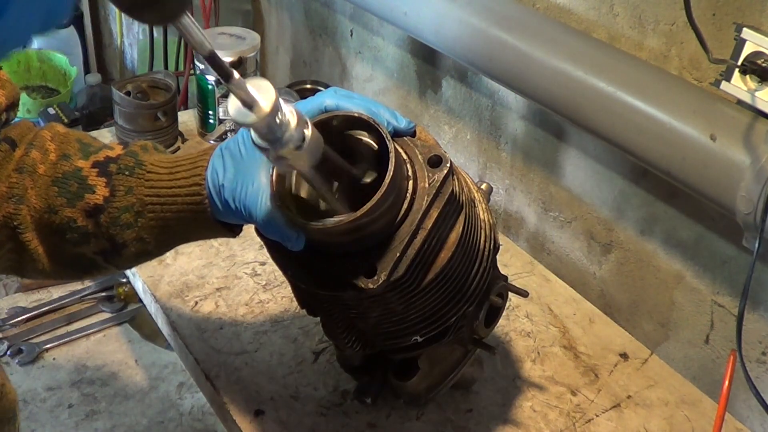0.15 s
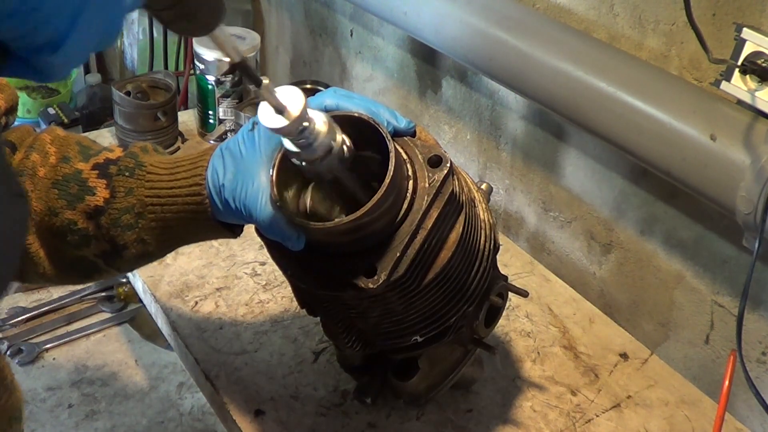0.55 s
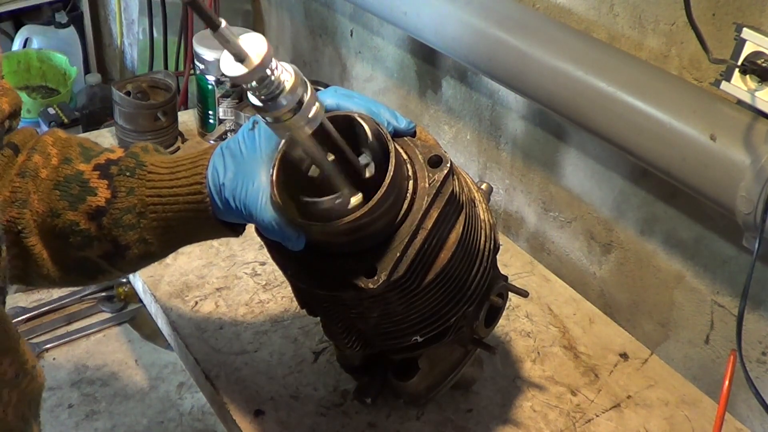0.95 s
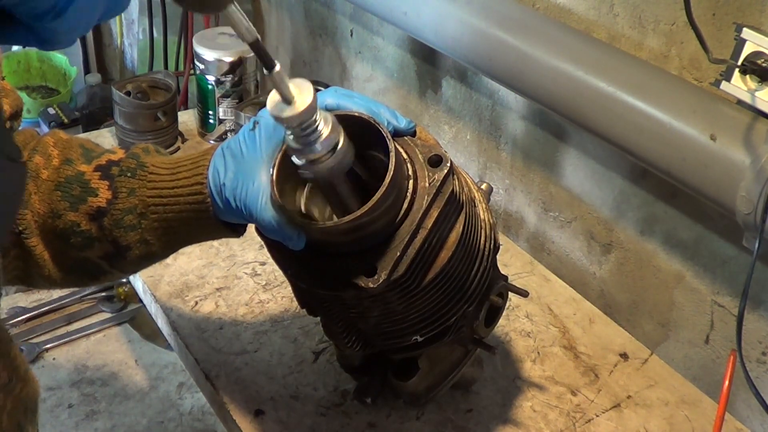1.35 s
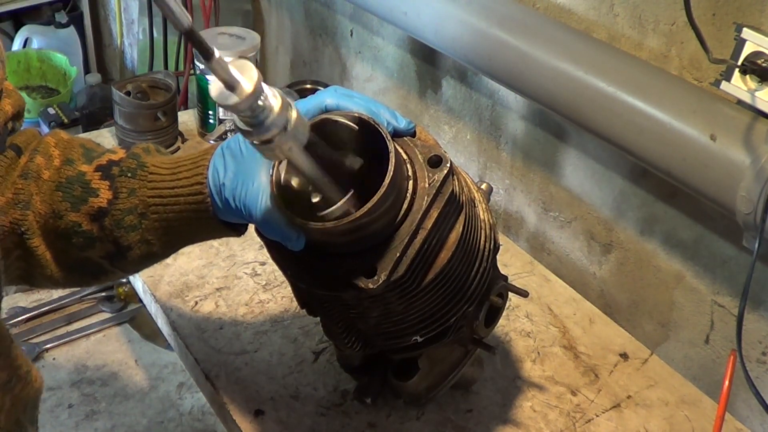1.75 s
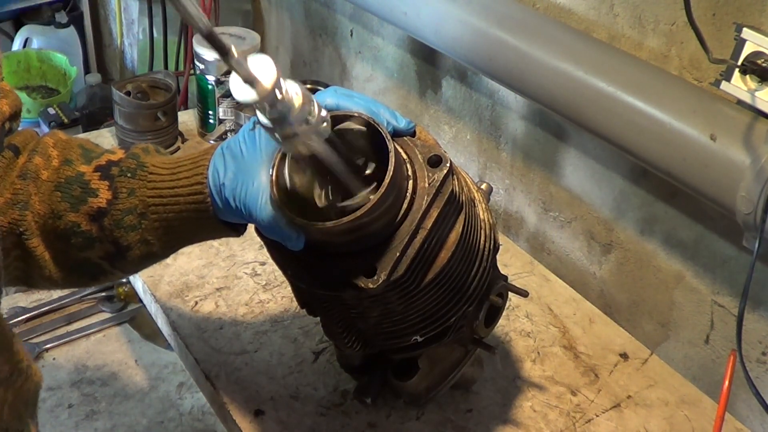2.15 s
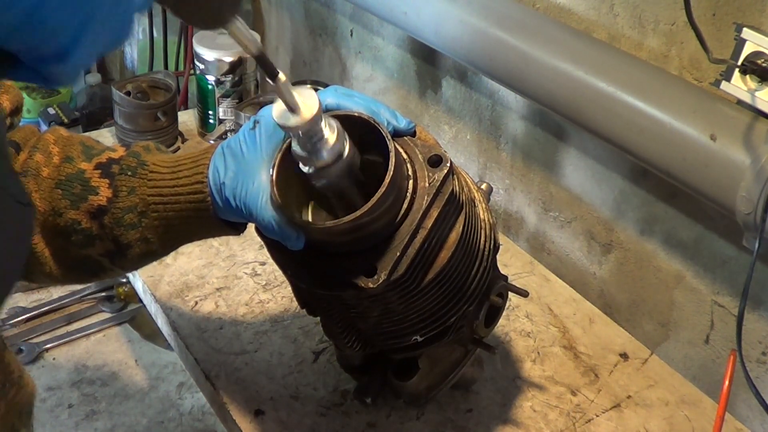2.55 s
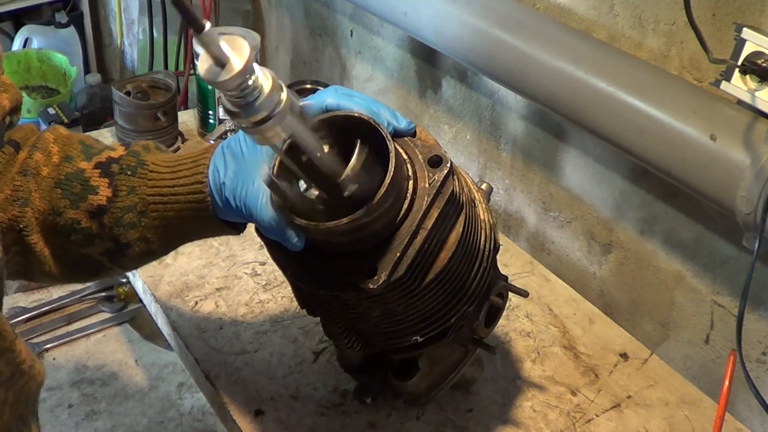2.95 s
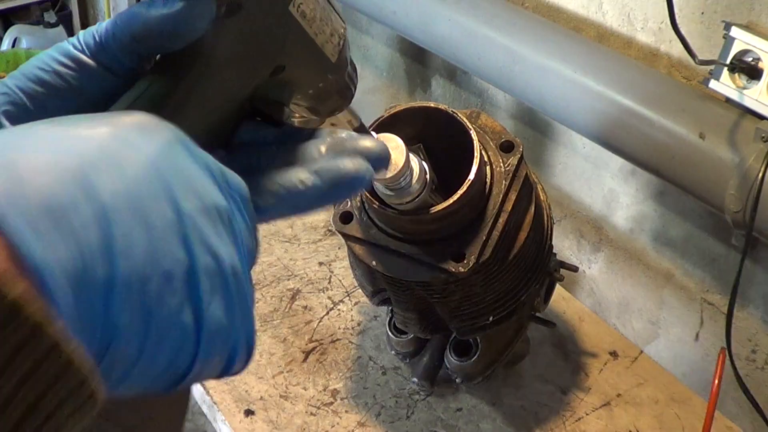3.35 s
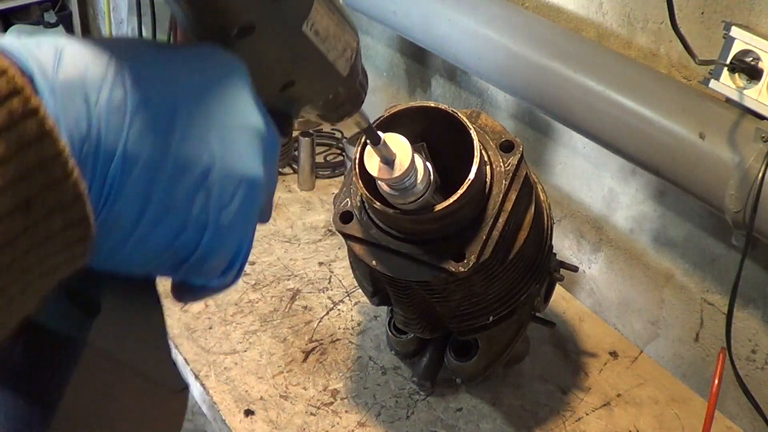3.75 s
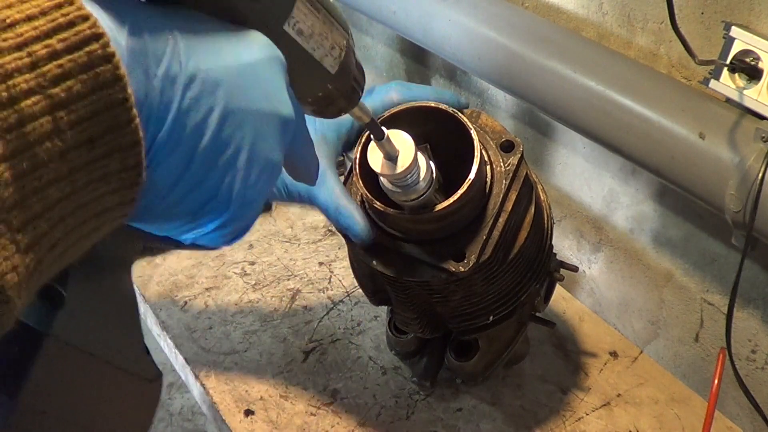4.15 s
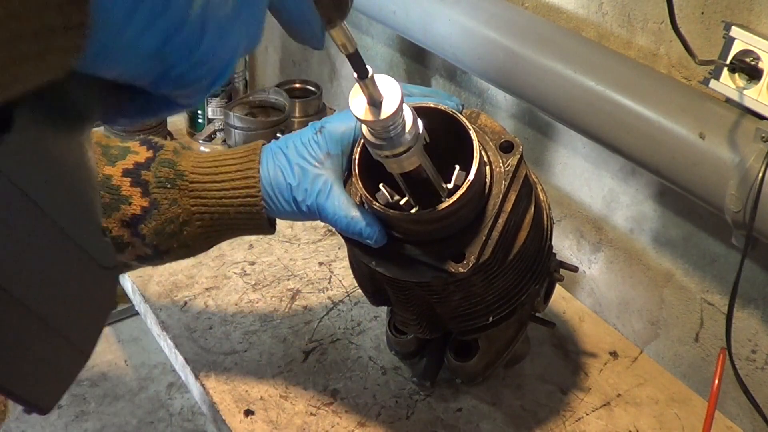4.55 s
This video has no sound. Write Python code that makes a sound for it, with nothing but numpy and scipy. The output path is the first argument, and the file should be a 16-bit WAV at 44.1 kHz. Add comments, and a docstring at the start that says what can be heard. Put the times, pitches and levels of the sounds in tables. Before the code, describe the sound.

Loud, bright abrasive honing with an electric motor whine stops dead, leaving quiet rubber rustles, small steel clinks, dull bench knocks and a final ringing scrape.

```python
"""A workshop bench, where a drill spins a hone in an oiled cylinder liner: the motor whines as harmonics
of its shaft speed, the stones hiss as friction noise, and the liner's resonances sing as each stroke nears
the rim. The honing breaks off abruptly. Rubber gloves rustle and snap over the drill as shaped noise,
struck modes knock on the bench, and the still hone scrapes up the bore over faint room air."""
import sys
import numpy as np
from scipy import signal
from scipy.fft import rfft, irfft, next_fast_len
from scipy.io import wavfile
from scipy.ndimage import uniform_filter1d, map_coordinates

SR = 44100
rng = np.random.default_rng(int(sys.argv[2]) if len(sys.argv) > 2 else 0)


def wav_out(sig):
    """Save sig, one row per channel (or a flat mono array), as 16-bit PCM at SR to the path in sys.argv[1]."""
    wavfile.write(sys.argv[1], SR, np.round(np.clip(np.atleast_2d(sig).T, -1, 1) * 32767).astype(np.int16))


N = 207711
TIME = np.arange(N) / SR

# motor speed: (time [s], shaft speed [turns/s])
SPEED = [(0, 400), (.04, 542), (.1, 607), (.17, 611), (.3, 532), (.43, 484), (.61, 511), (.72, 504),
         (.98, 519), (1.3, 503), (1.42, 506), (1.5, 527), (1.72, 549), (1.85, 538), (2, 540), (2.45, 524),
         (2.58, 530), (2.69, 512), (2.9, 528), (3.22, 524)]
# radiation of the drill's case: (frequency [Hz], relative level [dB])
CASE_RADIATION = [(400, -39), (485, -39), (505, -33), (519, -35.5), (533, -41), (548, -37), (562, -32),
                  (605, -43), (1450, -38), (1520, -38), (1555, -31), (1590, -31), (1618, -29.5),
                  (1648, -36), (1830, -42)]
# weaker motor lines: (multiple of shaft speed [-], relative level [dB])
OVERTONES = [(1.085, -52), (1.335, -54), (2, -47), (4, -45), (5, -51), (6, -52)]
# the weak lines grow as the motor takes up its load: time to full load, starting level
LOAD_S, UNLOADED_DB = 0.81, -2
# the motor works less, and so whines less, with the stones at the rim
WHINE_RIM_DB = -3


def motor():
    """Harmonic radiation: lines at multiples of the shaft speed swell where the case favours their pitch."""
    speed, = curves(SPEED)
    angle = 2 * np.pi * np.cumsum(speed * (1 + 0.0018 * wobble(60.1))) / SR

    def line(multiple, db, flutter_db):
        level = amp(db + flutter_db * wobble(70))
        return np.sqrt(2) * level * np.sin(multiple * angle)

    shaft = line(1, along(CASE_RADIATION, speed) - .2, flutter_db=1.5)
    third_db = along(CASE_RADIATION, 3 * speed) - .4 + 1.6 * wobble(11)
    third = line(3, third_db, flutter_db=2.2)
    load_db = UNLOADED_DB * np.clip(1 - TIME / LOAD_S, 0, 1)
    weak = sum(line(multiple, db + load_db + 0.37, flutter_db=4.0) for multiple, db in OVERTONES)
    whine = (shaft + third) * amp(WHINE_RIM_DB * stroke_height())
    return (whine + weak) * amp([[.6], [-.6]])


# spectrum of the bore scraped by the stones: (frequency [Hz], relative density [dB per Hz])
GRIND = [(25, -48), (110, -61), (200, -51), (430, -24.5), (800, -15), (1120, -9.5), (1420, -13),
         (1900, -4.5), (3000, -6), (4300, -7.5), (5100, -1.5), (7200, -3), (11800, -5.5), (16000, -16)]
# resonances of the rubbed steel: (frequency [Hz], width [Hz], relative level [dB])
STONES = [(8390, 720, 5.5), (10630, 220, -4.5), (14200, 250, -7), (15050, 150, -11)]
# resonances of the liner: (frequency [Hz], width [Hz], relative level [dB])
LINER = [(2163, 70, -4), (2574, 90, -9), (3536, 60, 1), (4840, 80, 1), (6550, 180, -5), (7254, 85, 3),
         (10790, 230, -5)]
# brief chatters of the drive: (time [s], level [dB], spread [s])
CHATTERS = [(.06, -41, 0.028), (.72, -29, 0.013), (1.48, -33, 0.018)]
# each layer: level deep in the bore [dB], change at the rim [dB]
GEAR_DB, GEAR_RIM_DB = -26.5, -4.5
GRIND_DB, GRIND_RIM_DB = -20.5, -0.5
STONE_DB, STONE_RIM_DB = -19.5, -1
LINER_DB, LINER_RIM_DB = -31.5, 10
# as the stones bed in, their bright hiss gives way to grinding
STONE_DB_PER_S, GRIND_DB_PER_S = -1, 0.39
# beside a loud clink the honing ducks briefly, the bright hiss most, then recovers
DUCK_DB, DUCK_RECOVERY_S = -7.5, 0.017
HISS_DUCK_DB, HISS_RECOVERY_S = -12, 0.027  # added for the hiss


def hone():
    """Friction-driven resonance: stones grind the bore; at the rim the liner rings more, the gears less."""
    height = stroke_height()

    def low_share(hz):
        return 1 / (1 + (hz / 3600) ** 6)

    def low_grind(hz):
        return colour(GRIND)(hz) * np.sqrt(low_share(hz))

    def high_grind(hz):
        return colour(GRIND)(hz) * np.sqrt(1 - low_share(hz))

    gear_level = amp(GEAR_DB + GEAR_RIM_DB * height) + swells(CHATTERS)
    gears = gear_level * friction(low_grind, rate=1500, grit=0.2, patchy_db=2.0)

    grind_db = GRIND_DB + GRIND_RIM_DB * height + GRIND_DB_PER_S * TIME
    grind = amp(grind_db) * friction(high_grind, rate=2700, grit=0.25, patchy_db=4.0)

    stone_db = STONE_DB + STONE_RIM_DB * height + STONE_DB_PER_S * TIME
    stone_db = stone_db + duck(HISS_DUCK_DB, HISS_RECOVERY_S)
    stone_db = stone_db + 0.23 * wobble(130) + 0.81 * wobble(15)
    stones = amp(stone_db) * friction(body(STONES), rate=1400, grit=0.26, patchy_db=2.0)

    ring = 0
    for hz, width, db in LINER:
        level = np.sqrt(width) * amp(db + 2.5 * wobble(18))
        ring = ring + level * friction(body([(hz, width, 0)]), rate=1500, grit=0.29, patchy_db=1.0)
    liner = amp(LINER_DB + LINER_RIM_DB * height) * unit(ring)

    level = amp(0.36 * wobble(90) + duck(DUCK_DB, DUCK_RECOVERY_S))
    return level * (gears * amp([[.6], [-.6]]) + grind + stones + liner)


# strokes lifting the stones toward the rim: (time at the top [s], height [0-1], spread [s])
STROKES = [(0.323, 0.73, 0.13), (1.03, 0.83, 0.13), (1.722, 0.9, 0.18), (2.323, 1, 0.11), (2.977, 1, 0.17)]


def stroke_height():
    """Reciprocating motion as a sum of bells: 0 deep in the bore, 1 at the rim."""
    return sum(height * np.exp(-.5 * ((TIME - s) / spread) ** 2) for s, height, spread in STROKES)


DUCK_S = .669


def duck(depth_db, recovery_s):
    """Gain reduction: the level [dB] ducks at once and recovers exponentially."""
    since = TIME - DUCK_S
    return depth_db * (since > 0) * np.exp(-np.abs(since) / recovery_s)


# singing modes of the bore: (time [s], frequency [Hz], relative level [dB], spread [s])
SQUEALS = [(.27, 4850, -28, .025), (.93, 4850, -28, .02), (.93, 7250, -27, .025), (1.04, 6530, -26, .04),
           (1.02, 3550, -29, .04), (1.65, 4860, -29, .025), (1.74, 2190, -33, .04), (1.77, 3545, -28, .015),
           (2.29, 6530, -27, .045), (2.97, 7270, -29, .05), (3.12, 4860, -28, .03),
           (4.145, 3555, -45, .012), (4.42, 6070, -27, .02), (4.45, 450, -45, .02),
           (4.483, 2280, -33, .016), (4.565, 2735, -34, .025), (4.592, 3560, -28, .012)]


def squeals():
    """Stick-slip excitation: each squeal is one wavering mode of the bore that swells and fades."""
    out = np.zeros(N)
    for s, hz, db, spread in SQUEALS:
        # higher modes are more heavily damped, so their pitch is less sure
        waver = np.sqrt(hz) * 0.000114 * wobble(250)
        angle = 2 * np.pi * np.cumsum(hz * (1 + waver)) / SR
        out += swells([(s, db, spread)]) * np.sqrt(2) * np.sin(angle)
    return out * amp(1.7 * wobble(120) - 1.0)


# spectrum of the scrape: (frequency [Hz], relative density [dB per Hz])
SCRAPE = [(100, -45), (450, -21.5), (850, -13), (2300, -16.5), (4100, -13.5), (5000, -2.5), (6100, -2),
          (7200, 2), (8400, 3), (10000, -6), (12500, -10.5), (16000, -16)]
# short slips of the stones: (time [s], level [dB], spread [s])
SLIPS = [(4.117, -32, 0.0066), (4.134, -22, 0.0067), (4.331, -26.5, 0.0046)]
# the bore with the stones at rest against it: (frequency [Hz], width [Hz], relative level [dB])
BORE = [(2280, 28, -2), (2740, 45, -4), (3555, 20, 5), (4820, 40, 0), (5200, 90, -3), (6060, 70, -2),
        (7890, 80, -1), (8450, 120, 1)]
DRAW_UNTIL_S = 4.6
SCRAPE_DB, SCRAPE_DB_PER_S = -19.5, -2
# the bore rings more as the stones near the rim, and outlasts the scrape
BORE_DB, BORE_DB_PER_S, BORE_HANG_S = -31.5, 16, 0.013


def drawn_hone():
    """Sliding friction: the resting stones slip a little, then scrape up the bore and set it ringing."""
    pressure = draw(SCRAPE_DB, SCRAPE_DB_PER_S, DRAW_UNTIL_S) * amp(0.88 * wobble(160)) + swells(SLIPS)
    scrape = pressure * friction(colour(SCRAPE), rate=2500, grit=0.36, patchy_db=4.5)
    ring_level = draw(BORE_DB, BORE_DB_PER_S, DRAW_UNTIL_S + BORE_HANG_S)
    ring = ring_level * friction(body(BORE), rate=2100, grit=0.19, patchy_db=-0.5)
    return scrape + ring


DRAW_FROM_S, DRAW_RISE_DB_PER_S, DRAW_FALL_DB_PER_S = 4.394, 304, 520


def draw(level_db, db_per_s, until_s):
    """Exponential envelope: attack, sloping hold and release of the pull, straight lines in dB."""
    attack_db = DRAW_RISE_DB_PER_S * np.minimum(TIME - DRAW_FROM_S, 0)
    hold_db = db_per_s * (np.clip(TIME, DRAW_FROM_S, until_s) - DRAW_FROM_S)
    release_db = DRAW_FALL_DB_PER_S * np.minimum(until_s - TIME, 0)
    return amp(level_db + attack_db + hold_db + release_db)


# light metal contacts: (time [s], peak level [dB], ring gain [-])
CLINKS = [(.672, -7, 0.93), (3.348, -27.5, .05), (3.542, -21, .1), (3.565, -14.5, 0.23), (3.736, -23, .2),
          (4.088, -22, 0.35), (4.288, -13.5, 1)]
# modes of the hone's steel arms: (frequency [Hz], mean level [dB], t60 [s])
STEEL = [(5200, -1, .022), (6040, -2, .04), (7537, -2, .022), (8619, -7, .035), (9900, -9, .03),
         (11640, -6, .02)]
# dull knocks through the bench: (time [s], peak level [dB], ring gain [-])
KNOCKS = [(3.298, -35, 0.028), (3.326, -35, 0.045), (3.339, -42, .05), (3.37, -43, .05),
          (3.566, -31, 0.083), (3.579, -24, 1), (4.329, -38, 0.16), (4.337, -31.5, 1)]
# modes of the bench top: (frequency [Hz], mean level [dB], t60 [s])
BENCH = [(268, -3.5, .45), (276, 0, .1), (315, -6, .1), (358, -13, .25), (410, -9, .1)]


def contacts():
    """Impact excitation of modes: the hone's arms clink on the liner; the cylinder rocks on the bench."""
    clinks = strikes(CLINKS, STEEL, low_hz=4240, high_hz=12800, crack_t60=0.022)
    knocks = strikes(KNOCKS, BENCH, low_hz=221, high_hz=1010, crack_t60=0.036)
    return clinks + knocks


# rustles as the hands move over the drill: (time [s], level [dB], spread [s])
GRIPS = [(3.45, -41, .06), (3.57, -34.5, 0.023), (3.69, -39.5, 0.13), (4.0, -41, 0.047),
         (4.11, -41.5, 0.044), (4.21, -45.5, 0.044), (4.33, -40, .035), (4.63, -40.5, 0.047)]
# spectrum of the rustling rubber: (frequency [Hz], relative density [dB per Hz])
GLOVE = [(60, -27), (200, -11.5), (400, -4.5), (1100, -8), (1700, 0), (2300, -3.5), (2900, -5.5),
         (5200, 0.5), (7000, -1.5), (9200, 1), (11000, -4.5), (13000, -13), (16000, -10)]
# rubber sliding over the drill's case: (time [s], level [dB], spread [s])
SWISHES = [(3.404, -35, .003), (3.463, -36, .004), (3.652, -22.5, 0.015), (3.794, -30.5, 0.0013)]
# spectrum of the sliding rubber: (frequency [Hz], relative density [dB per Hz])
SWISH = [(100, -40), (800, -16.5), (1650, -12), (2800, -21), (5300, -4), (6400, -10), (9200, 0.5),
         (11500, -6), (14800, -10), (16000, -13)]
# snaps of the rubber: (time [s], peak level [dB], ring gain [-])
SNAPS = [(3.298, -47, 0.43), (3.608, -28, 0.92), (3.624, -27, 1), (3.667, -27, 1), (3.866, -29.5, 0.27)]


def gloves():
    """Friction noise and impacts: rubber crinkles, slides and snaps as the grip changes."""
    rustle_level = swells(GRIPS) * amp(1.6 * wobble(60))
    rustle = rustle_level * friction(colour(GLOVE), rate=500, grit=0.22, patchy_db=0.8)
    swish = swells(SWISHES) * friction(colour(SWISH), rate=5000, grit=0.21, patchy_db=4.0)
    rubber = [(1670, 0.16, 0.018), (2190, -2, .01)]  # (frequency [Hz], mean level [dB], t60 [s])
    snaps = strikes(SNAPS, rubber, low_hz=900, high_hz=4440, crack_t60=0.0094)
    return rustle + swish + snaps


# decay of the workshop: (frequency [Hz], t60 [s])
SHOP = [(200, 0.18), (2000, 0.69), (12000, 0.06)]


def workshop(x):
    """Reverberation: the walls answer with a noise tail in which each frequency dies at its own speed."""
    hz, t, z = signal.stft(rng.standard_normal((2, SR // 2)), SR, nperseg=256)
    decay = amp(-60 * t / along(SHOP, hz)[:, None])
    tail = signal.istft(z * decay, SR, nperseg=256)[1]
    tail = tail / np.linalg.norm(tail[0])
    return signal.fftconvolve(np.atleast_2d(x), tail, axes=1)[:, :N]


# spectrum of the room air: (frequency [Hz], relative density [dB per Hz])
AIR = [(25, -22), (50, -10), (90, -3), (180, -5), (450, 8.5), (900, 6.5), (1300, 4.5), (1700, 4),
       (3000, -1.5), (6000, 1.5), (9000, 4), (13000, -5), (16000, -10)]
AIR_DB = -48.7


def room_air():
    """Stationary noise: a steady, faint, coloured hiss without grit."""
    return amp(AIR_DB) * friction(colour(AIR), rate=1000, grit=0, patchy_db=0)


# likeness of the two channels: (frequency [Hz], left-right correlation [-])
ALIKE = [(60, 0.82), (500, 0.86), (1200, 0.93), (2800, 0.86), (4500, 1), (7000, 0.96), (10000, 1),
         (14000, 0.85)]


def friction(response, rate, grit, patchy_db):
    """Partly coherent noise of rms 1: hiss plus a share of grit catching rate times a second on average."""
    catches = unit((rng.random(N) < rate / SR) * rng.uniform(-1.05, 1, (2, N)))
    hiss = rng.standard_normal((2, N))
    force = patches(np.sqrt(1 - grit) * hiss + np.sqrt(grit) * catches, patchy_db)

    def mid_side(hz):
        turn = np.arccos(np.clip(along(ALIKE, hz), -1, 1)) / 2
        return response(hz) * np.array([np.cos(turn), np.sin(turn)])

    mid, side = filtered(force, mid_side)
    return unit(np.array([mid + side, mid - side]))


def patches(x, patchy_db):
    """Shifting contact: ever-changing narrow bands are favoured for a few hundredths of a second."""
    z = signal.stft(x, nperseg=512)[2]
    field = uniform_filter1d(rng.standard_normal(z.shape[1:]), size=3, axis=0)
    field = uniform_filter1d(field, size=6, axis=1)
    return signal.istft(z * amp(patchy_db * unit(field)), nperseg=512)[1][:, :N]


def strikes(rows, modes, low_hz, high_hz, crack_t60):
    """Modal impact: each contact is a brief band of crack and rings the modes at new strengths."""
    out, t = np.zeros(N + SR), np.arange(SR // 2) / SR
    band = signal.butter(2, [low_hz, high_hz], "bandpass", fs=SR, output="sos")
    for s, db, ring_gain in rows:
        ring = 0
        for hz, level, t60 in modes:
            decay = amp(level + rng.normal(0, 4.7) - 60 * t / t60)
            ring = ring + decay * np.sin(2 * np.pi * hz * t)
        crack = unit(signal.sosfilt(band, rng.standard_normal(len(t)))) * amp(-60 * t / crack_t60)
        hit = signal.sosfilt(band, ring_gain * ring + crack)
        out[round(s * SR):][:len(t)] += amp(db) * hit / np.abs(hit).max()
    return out[:N]


def swells(rows):
    """Gaussian envelope: a bell for each (time [s], level [dB], spread [s])."""
    return sum(amp(db) * np.exp(-.5 * ((TIME - s) / spread) ** 2) for s, db, spread in rows)


def body(modes):
    """Resonance: the summed response of damped modes (frequency [Hz], width [Hz], level [dB])."""
    def response(f):
        return sum(amp(db) * 1j * f * w / (c * c - f * f + 1j * f * w) for c, w, db in modes)
    return response


def colour(points):
    """Spectral shaping: the response of a broad spectrum."""
    return lambda hz: amp(along(points, hz))


def filtered(x, response):
    """Linear filtering: x times a complex response of frequency."""
    m = next_fast_len(N + SR // 2)
    return irfft(rfft(x, m) * response(np.fft.rfftfreq(m, 1 / SR)), m)[..., :N]


def wobble(rate):
    """Random modulation: a smooth curve with rate knots a second."""
    return map_coordinates(rng.standard_normal(int(N * rate / SR) + 4), [TIME * rate])


def curves(rows):
    """Linear interpolation in time: one value per sample for each column after the time."""
    s, *cols = np.transpose(rows)
    return [np.interp(TIME, s, c) for c in cols]


def along(points, hz):
    """Logarithmic pitch: (frequency [Hz], value) points interpolated on a log axis."""
    f, v = np.transpose(points)
    return np.interp(np.log(hz + 1), np.log(f + 1), v)


def unit(x):
    """Power normalisation: scale to rms 1."""
    return x / np.sqrt(np.mean(x ** 2) + 1e-20)


def amp(db):
    """Logarithmic level: decibels to gain."""
    return 10 ** (np.asarray(db) / 20)


CUT_S = 3.224


def scene():
    """Superposition: honing until the abrupt break, then handling, over faint room air."""
    running = np.clip((CUT_S - TIME) * 1000, 0, 1)  # falls to 0 within a millisecond
    honing = motor() + hone() * amp([[.2], [-.2]])
    hands = (1 - running) * (gloves() + drawn_hone())
    handling = hands * amp([[-.15], [.15]]) + contacts()
    echo = amp(-20) * workshop(handling)
    return running * honing + squeals() + handling + echo + room_air()


# phase between two microphone ports: (frequency [Hz], left minus right phase [rad])
PORTS = [(60, 0), (260, -0.15), (500, -0.72), (900, -0.69), (1600, -0.28), (2500, 0.86), (3100, -0.89),
         (4000, 0.17), (8500, -0.41), (10000, 0.071)]
TOP_HZ = 15780


def record(dry):
    """Phase difference, saturation and band limit: two ports, rounded peaks, nothing above TOP_HZ."""
    ported = filtered(dry, lambda hz: np.exp(.5j * along(PORTS, hz) * np.array([[1], [-1]])))
    ceiling = .62
    rounded = ported / (1 + np.abs(ported / ceiling) ** 6) ** (1 / 6)
    return filtered(rounded, lambda hz: hz < TOP_HZ)


dry = scene()
out = record(dry)
wav_out(out)
```